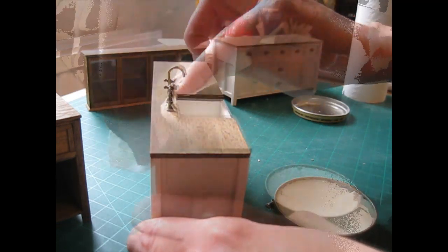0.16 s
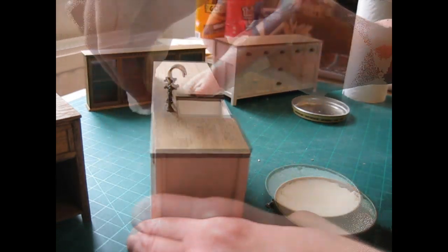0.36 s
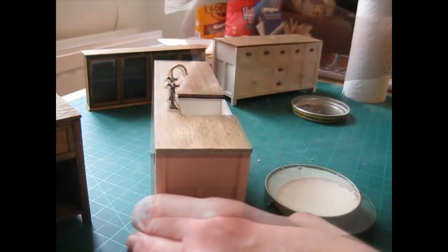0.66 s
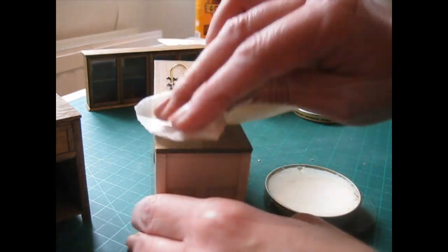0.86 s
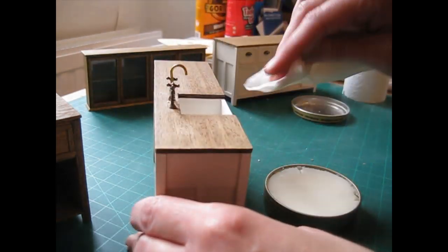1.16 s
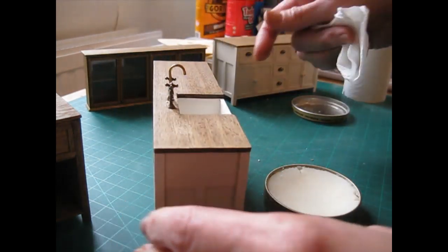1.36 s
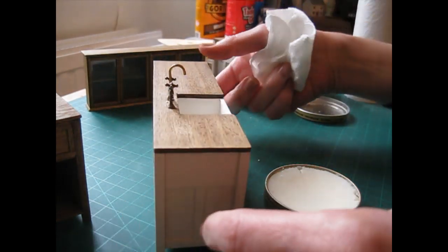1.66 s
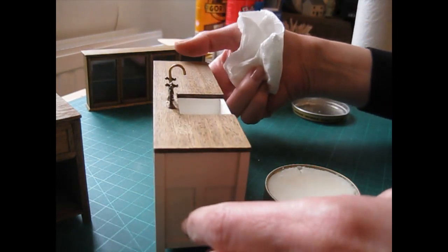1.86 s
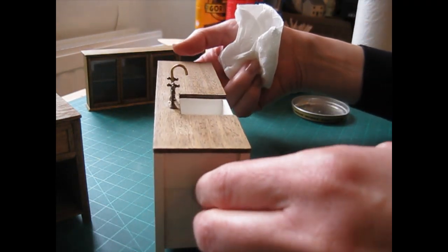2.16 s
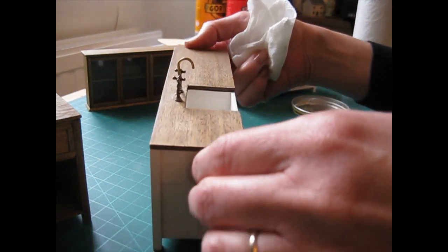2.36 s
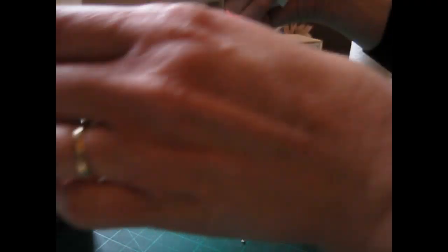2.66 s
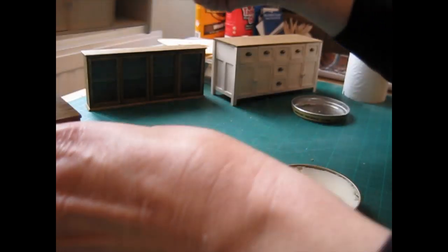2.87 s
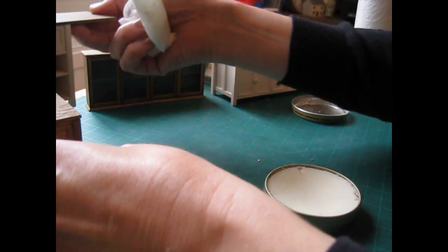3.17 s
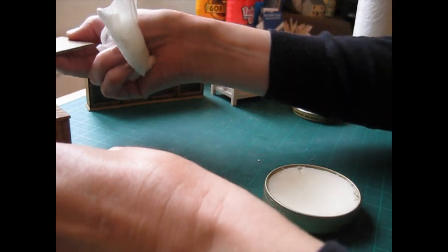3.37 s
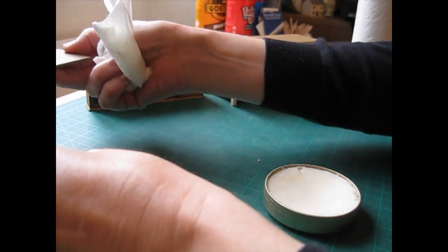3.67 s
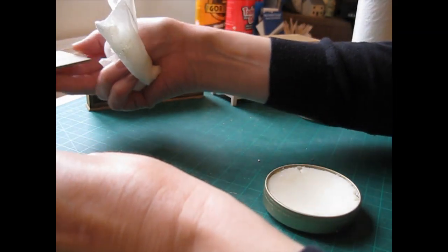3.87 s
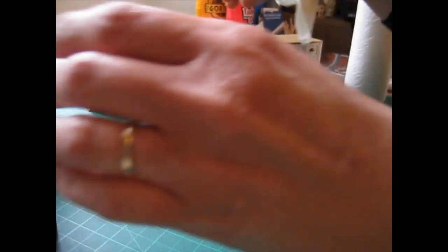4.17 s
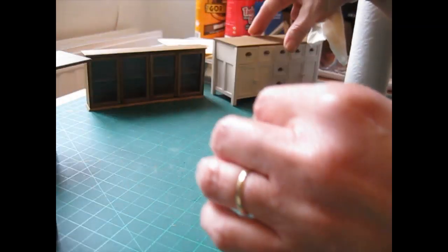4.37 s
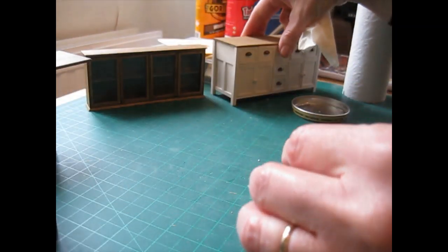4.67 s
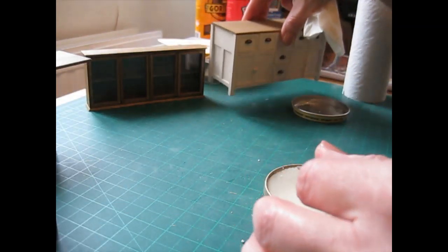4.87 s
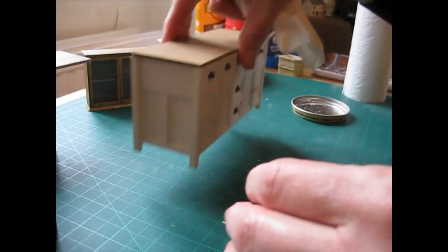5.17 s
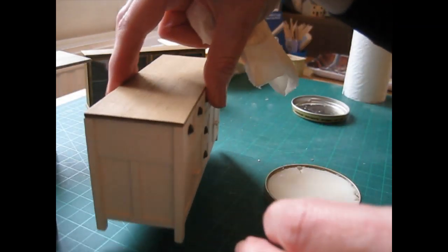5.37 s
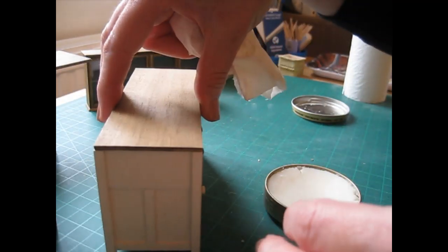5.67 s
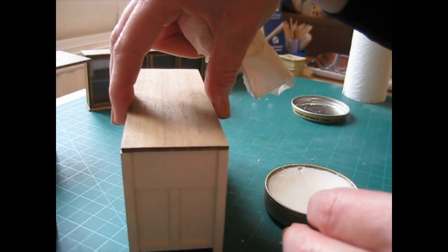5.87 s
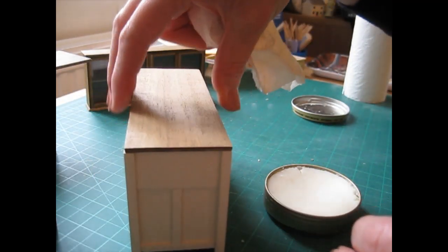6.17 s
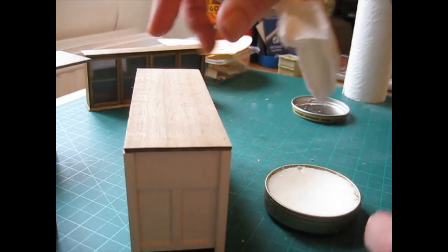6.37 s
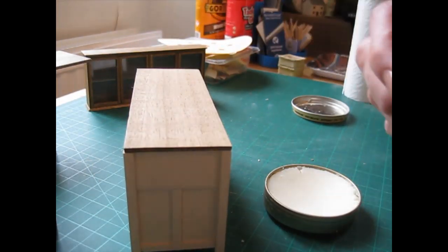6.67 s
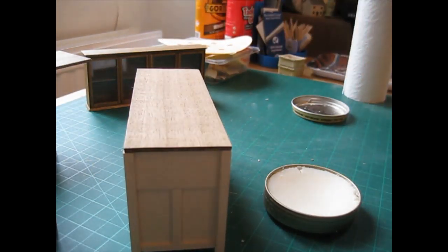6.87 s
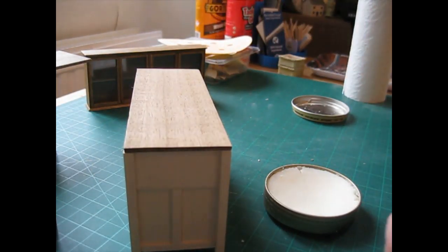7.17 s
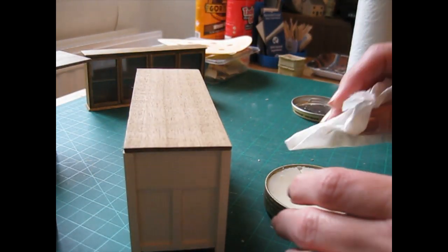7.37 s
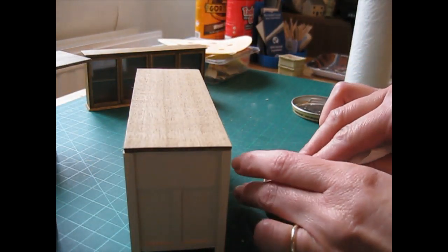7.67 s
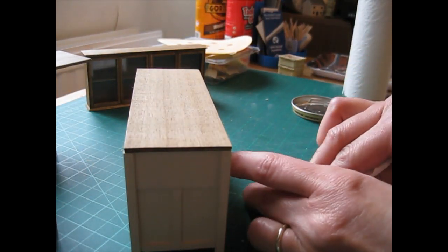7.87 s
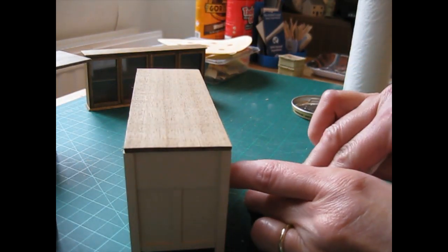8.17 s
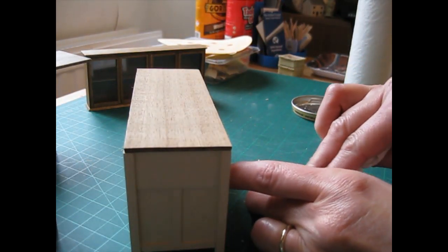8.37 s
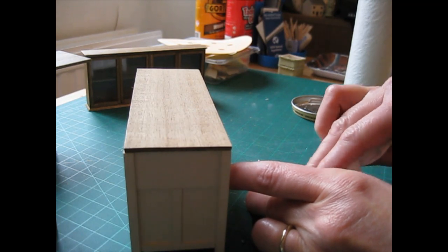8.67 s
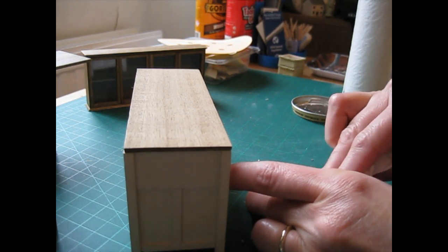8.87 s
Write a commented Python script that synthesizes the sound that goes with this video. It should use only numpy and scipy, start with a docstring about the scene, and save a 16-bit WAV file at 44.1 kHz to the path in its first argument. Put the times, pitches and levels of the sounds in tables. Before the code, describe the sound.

Papery rubbing on wood with a tiny squeak, sharp wooden knocks and light slides, then soft circular rubbing in a tin, over faint hiss.

```python
"""At a work table, a paper towel wipes a small wooden cabinet, squeaking on its waxed top. The pieces are
slid and set down on a cutting mat with knocks, snaps and one metal clink. Then the towel is bunched up
and rubbed round a tin of wax. Each rub is thousands of tiny slips that make the rubbed thing ring; each
knock is a short push and a rattle, with a faint room echo. A small camera close by hisses and has a
blind spot near 8 kHz."""
import sys
import numpy as np
from scipy import signal
from scipy.fft import rfft, irfft, next_fast_len
from scipy.io import wavfile
from scipy.ndimage import uniform_filter1d

SR = 44100
rng = np.random.default_rng(int(sys.argv[2]) if len(sys.argv) > 2 else 0)


def wav_out(sig):
    """Save sig, one row per channel (or a flat mono array), as 16-bit PCM at SR to the path in sys.argv[1]."""
    wavfile.write(sys.argv[1], SR, np.round(np.clip(np.atleast_2d(sig).T, -1, 1) * 32767).astype(np.int16))


N = 397341


def amp(db):
    """Turns decibels into a gain."""
    return 10 ** (np.asarray(db) / 20)


def unit_rms(x):
    """Scales x to an average (rms) size of 1."""
    return x / np.sqrt(np.mean(x ** 2) + 1e-20)


def value_at(points, hz):
    """Reads a curve of (frequency, value) points at hz."""
    f, value = np.transpose(points)
    return np.interp(np.log(hz + 1), np.log(f + 1), value)


def add(mix, start_s, sound):
    """Mixes a sound in at start_s and returns the mix."""
    part = mix[max(round(start_s * SR), 0):][:len(sound)]
    part += sound[:len(part)]
    return mix


def filtered(x, gain):
    """Filters x by a gain that is a function of Hz."""
    size = next_fast_len(len(x) + 4096)
    return irfft(rfft(x, size) * gain(np.fft.rfftfreq(size, 1 / SR)), size)[:len(x)]


def above(hz, edge_hz):
    """A gain that climbs steeply from 0 below the edge to 1 above it."""
    return 1 / np.sqrt(1 + (edge_hz / (hz + 1)) ** 12)


def bump(hz, centre_hz, width_hz):
    """A smooth hill of height 1 around a frequency."""
    return 1 / (1 + (2 * (hz - centre_hz) / width_hz) ** 2)


def swells(strokes, t):
    """Strokes swell and fade; returns their ringing pitch and the scratch, fine hiss and body gains."""
    peak_s, db, rise_s, fall_s, ring_hz, fine_db, body_db = np.transpose(strokes)[:, :, None]
    from_peak = np.where(t < peak_s, (peak_s - t) / rise_s, (t - peak_s) / fall_s)
    power = amp(db - 21 * from_peak ** 1.63) ** 2 + 1e-30  # round top, 21 dB down at both ends
    gains = [np.sqrt((power * amp(layer_db) ** 2).sum(0)) for layer_db in (0, fine_db, body_db)]
    return [(power * ring_hz).sum(0) / power.sum(0), *gains]


def rub(strokes, colour, peaks, span_s, split_hz, ring_width_hz, ring_db, overtone_db,
        grit_db, grain_db, flutter_db, wander_db):
    """Thousands of tiny slips, a few of them large, under a fluttering pressure, ring the thing rubbed."""
    t = np.arange(*span_s, 1 / SR)
    curves = swells(strokes, t[::32])
    ring_hz, scratch_gain, fine_gain, body_gain = (np.interp(t, t[::32], curve) for curve in curves)
    slips = rng.standard_normal(len(t)) * amp(grain_db * np.minimum(rng.exponential(1, len(t)), 4))
    pressure = unit_rms(uniform_filter1d(uniform_filter1d(rng.standard_normal(len(t)), 300), 300))
    bin_hz, frame_s, spectra = signal.stft(slips * amp(flutter_db * pressure), SR,
                                           nperseg=256, noverlap=192)
    pitch_hz = np.interp(frame_s + span_s[0], t, ring_hz)
    lift_db = sum(db * bump(bin_hz[:, None], ratio * pitch_hz, ring_width_hz)
                  for ratio, db in ((1, ring_db), (1.92, overtone_db)))
    # the contact keeps changing shape, so bright patches wander through the spectrum
    patches = uniform_filter1d(rng.standard_normal(spectra.shape), 3, axis=0)
    patches = unit_rms(uniform_filter1d(patches, 20, axis=1))
    spectra = spectra * amp(wander_db * patches + lift_db)
    slips = signal.istft(spectra, nperseg=256, noverlap=192)[1][:len(t)]
    tone = lambda hz: amp(value_at(colour, hz) + sum(db * bump(hz, f, width) for f, width, db in peaks))
    # three layers: a dull body below split_hz, a bright scratch above it, fine hiss on top
    body = filtered(slips, lambda hz: tone(hz) * (1 - above(hz, 1.007 * split_hz)))
    scratch = filtered(slips, lambda hz: tone(hz) * above(hz, 1.034 * split_hz) * (1 - above(hz, 7850)))
    fine = filtered(slips, lambda hz: above(hz, 6600) / (hz + 4000) * amp(grit_db * bump(hz, 10400, 1500)))
    sound = scratch_gain * unit_rms(scratch) + body_gain * unit_rms(body) + fine_gain * unit_rms(fine)
    return add(np.zeros(N), span_s[0], sound)


def camera_hiss(level_db=-56):
    """Steady noise from the room and the microphone's amplifier."""
    # colour of the hiss: f/Hz, level/dB
    colour = [(25, -3), (280, 0), (800, -2.5), (2300, -5), (4700, -10), (7000, -14), (9000, -20.5),
              (12000, -22), (15500, -26)]
    return amp(level_db) * unit_rms(filtered(rng.standard_normal(N), lambda hz: amp(value_at(colour, hz))))


def towel_wipes():
    """The paper towel rasps over the cabinet and makes its top ring."""
    # wipes: peak t/s, level/dB, rise/s, fall/s, ring f/Hz, fine hiss/dB, body/dB (both added to level)
    strokes = [(.03, -45.5, 0.17, 0.084, 4300, -10.5, -20), (.47, -47, 0.29, 0.21, 4000, -8, -11.5),
               (.51, -41.5, 0.055, 0.043, 4470, -17, -3), (.58, -38, 0.11, 0.031, 3200, -5, -10.5),
               (.6, -44, .04, .007, 3300, 3, -1), (.72, -54, 0.31, 0.28, 2190, -25, -12),
               (1.01, -41, 0.066, 0.14, 3000, -19, -11.5), (1.075, -39.5, 0.088, 0.13, 4530, -9, -13.5),
               (1.236, -39.5, 0.038, 0.1, 3000, -13, -11.5), (1.291, -31, 0.092, 0.11, 2660, -14, -12.5),
               (1.446, -36.5, 0.073, 0.071, 2480, -13, -14), (1.606, -52, 0.11, 0.039, 3500, -14, -11),
               (1.77, -55, 0.3, 0.18, 2400, -13.5, -10)]
    # colour of paper on wood: f/Hz, level/dB
    colour = [(150, -21), (250, -10.5), (850, -7), (1100, -0.5), (1800, 0), (2700, -0.5), (5600, -2.5),
              (7300, -3.5)]
    # peaks and a dip in the ring of the top: f/Hz, width/Hz, level/dB
    peaks = [(1520, 150, -5.5), (2050, 420, 2), (3200, 550, 2), (4280, 470, 3.5), (5100, 220, 3)]
    return rub(strokes, colour, peaks, span_s=(0, 2.05), split_hz=1720, ring_width_hz=1100,
               ring_db=4.5, overtone_db=-1.5, grit_db=4, grain_db=3.5, flutter_db=0.6, wander_db=1.9)


def towel_squeaks():
    """The towel catches and slips quickly on the waxed top: short, slightly unsteady tones."""
    # squeaks: t/s, level/dB, f/Hz, length/s
    squeaks = [(.527, -37, 3200, .012), (0.57, -31, 3110, 0.013), (0.582, -38, 3100, 0.0091)]
    mix = np.zeros(N)
    for start_s, peak_db, pitch_hz, length_s in squeaks:
        t = np.arange(0, length_s, 1 / SR)
        wobble = 1 + 0.04 * unit_rms(uniform_filter1d(rng.standard_normal(len(t)), 60))
        tone = np.sin(2 * np.pi * np.cumsum(pitch_hz * wobble) / SR)
        add(mix, start_s, amp(peak_db) * np.sin(np.pi * t / length_s) * tone)
    return mix


def knock_click(length, thump_db, hollow_db, upper_db, treble_db):
    """The click that colours one knock; a harder, brighter blow cracks more."""
    # where each of the ten levels below applies: f/Hz
    points_hz = (40, 130, 380, 850, 2000, 3400, 4600, 7200, 11000, 16000)
    crack_db = -16 + 1.74 * treble_db
    levels_db = [thump_db - 34.5, thump_db - 11.5, thump_db, hollow_db, 0,
                 upper_db, treble_db, treble_db - 12.5, crack_db, crack_db - 12.5]
    hz = abs(np.fft.fftfreq(length, 1 / SR))
    log_gain = np.log(amp(value_at(list(zip(points_hz, levels_db)), hz)))
    spectrum = np.exp(np.conj(signal.hilbert(log_gain)))  # minimum phase: no sound before the hit
    return np.fft.ifft(spectrum).real[:2048]


def wood_knocks(push_t60_s=0.0068, rattle_t60_s=0.13, bounce_s=0.0042, ring_db=-33):
    """Wood is set down or bumped: a short push, its bounce, a rough dying rattle and a soft ring."""
    # knocks: t/s, level/dB, then thump/dB, hollow/dB, upper middle/dB, treble/dB (all four against
    # 2 kHz), rattle/dB (against the push)
    knocks = [(0.608, -30, 5, 3, -1, -15, -28), (0.6121, -3.5, -11.5, -7.5, -16, -9.5, -27.5),
              (0.6216, -22, -3, -9, 1, -9, -11), (2.0842, -20, -15, -8, -4, 4, -30.5),
              (2.119, -29, 3, 4, -4, -12, -20.5), (2.281, -32, -1, -13, -18, -21, -32),
              (3.296, -38, 19, 9, -2, 5, -21), (3.5389, -19, -2, 4, -4.5, -18.5, -23),
              (3.7782, -20.5, 6, 11.5, -4, -11, -27), (4.0232, -31.5, -3, -1, -8, -2, -20),
              (4.473, -35.5, 4, 14, -1, 7, -21), (4.7034, -32.5, 13, 5, 6, -1, -20),
              (5.5552, -23, 13, 6, 0, -8, -31), (5.5845, -29, 12, 5, 2, -12, -21),
              (5.5928, -2, -6.5, 8.5, -2.5, -13, -33.5), (5.652, -32, 5, 10, -12, -11, -29),
              (5.6656, -30, 14, 1, -6, -9, -22), (5.732, -31.5, 0, -3, -8, -21, -26),
              (6.073, -38, 15, 23, -3, -10, -34), (6.1965, -24.5, 4, -9, -4, -7.5, -26),
              (6.206, -28, 3, -3, -7, -12, -29)]
    # tones the wood rings with: f/Hz, level/dB, t60/s (the time to fade by 60 dB)
    wood_tones = [(300, -3, 0.12), (412, -3.5, 0.071), (499, 2, 0.034), (733, 3.5, 0.022), (953, 3, 0.033),
                  (1197, 0.5, 0.018), (1780, 3.5, 0.034), (2170, 2.5, 0.017), (2563, 0.5, 0.034),
                  (3750, -2, 0.026)]
    hz, db, t60 = np.transpose(wood_tones)[:, :, None]
    t = np.arange(8192) / SR
    mix = np.zeros(N)
    for start_s, peak_db, *colour_db, rattle_db in knocks:
        jolts, shake = rng.standard_normal((2, len(t)))
        push = (t == 0) + 0.44 * jolts * amp(-60 * t / push_t60_s)
        bounce = 0.15 * np.pad(push, (round(bounce_s * SR), 0))[:len(t)]
        rough_db = 3 * unit_rms(uniform_filter1d(shake, 120))
        rattle = jolts[::-1] * amp(rattle_db - 60 * t / rattle_t60_s + rough_db)
        tone_hz = hz * rng.uniform(0.97, 1.02, hz.shape)
        tone_db = ring_db + db + 3.5 * rng.standard_normal(db.shape)
        ring = (amp(tone_db - 60 * t / t60) * np.sin(2 * np.pi * tone_hz * t)).sum(0)
        blow = signal.fftconvolve(push + bounce + rattle + ring, knock_click(len(t), *colour_db))[:len(t)]
        add(mix, start_s, amp(peak_db) * blow / abs(blow).max())
    return mix


def room_echo(x):
    """The room sends back many small echoes, and the high notes die first."""
    # time an echo takes to fade by 60 dB: f/Hz, t60/s
    fade_times = [(200, 0.47), (1000, 0.22), (3000, 0.21), (8000, 0.11)]
    echoes = np.zeros(SR // 2)
    slots = np.arange(180, len(echoes) - 20, 20)
    echoes[slots + rng.integers(0, 20, len(slots))] = rng.choice([-1., 1.], len(slots))
    hz, t, spectra = signal.stft(echoes, SR, nperseg=256)
    fade = amp(-60 * t / value_at(fade_times, hz)[:, None])
    tail = signal.istft(spectra * fade, SR, nperseg=256)[1]
    return signal.fftconvolve(x, tail / np.linalg.norm(tail))[:N]


def dry_snaps(rise_s=0.000067, t60_s=0.0095):
    """Paper, nails and small joints snap: tiny bursts of noise, each with one broad peak."""
    # snaps: t/s, level/dB, centre f/Hz
    snaps = [(1.2317, -23, 4000), (1.297, -27, 2630), (1.531, -39, 4000), (1.56, -38.5, 3950),
             (1.6966, -36, 3200), (2.825, -37, 3000), (2.883, -35, 3070), (2.9128, -30, 5000),
             (2.9928, -36, 2670), (3.451, -39, 3500), (3.478, -42, 3620), (3.532, -34, 3600),
             (3.578, -38.5, 3400), (3.7283, -40, 4870), (3.882, -43, 5500), (3.975, -38, 4000),
             (4.0035, -33, 2400), (4.7043, -36, 10500), (5.2235, -44, 3460), (6.732, -26.5, 3000),
             (6.936, -30, 3300), (7.2342, -27, 3200), (7.253, -42, 11000), (7.254, -31.5, 3200),
             (7.6746, -36.5, 3400), (8.2773, -30, 4500), (8.372, -31, 4400)]
    t = np.arange(800) / SR
    floor = lambda hz: 0.25 * (1 - 0.98 * above(hz, 8200))
    mix = np.zeros(N)
    for start_s, peak_db, centre_hz in snaps:
        burst = rng.standard_normal(len(t)) * amp(-60 * t / t60_s) * np.minimum(t / rise_s, 1)
        snap = filtered(burst, lambda hz: above(hz, 0.72 * centre_hz)
                        * (floor(hz) + bump(hz, centre_hz, 2600)))
        add(mix, start_s, amp(peak_db) * snap / abs(snap).max())
    return mix


def wood_slides():
    """The cabinet's pieces scrape over the cutting mat with a hollow ring."""
    # slides: peak t/s, level/dB, rise/s, fall/s, ring f/Hz, fine hiss/dB, body/dB (both added to level)
    strokes = [(2.125, -48.5, 0.034, 0.078, 1950, -17, -18), (2.33, -50.5, 0.26, 0.22, 2050, -18, 0),
               (2.386, -41.5, 0.029, 0.074, 2050, -14.5, -6), (2.445, -44.5, 0.09, 0.031, 2050, -13, -25),
               (3.372, -50.5, 0.078, 0.056, 720, -5, -3), (3.947, -51.5, 0.13, 0.069, 714, -13.5, -10.5),
               (4.026, -47, .006, .008, 3300, -5, -5), (4.032, -49.5, 0.041, 0.24, 2720, -17, -22),
               (4.22, -51, 0.15, 0.16, 2520, -18, -9), (4.486, -53, 0.078, 0.086, 3170, -17, -0.5),
               (4.6, -59, 0.096, 0.086, 4070, -5.5, -1), (5.673, -48, 0.011, 0.048, 2220, -13, -2),
               (5.77, -43.5, 0.024, 0.11, 2140, -13, -1), (5.913, -50, 0.1, 0.037, 2170, -16, -3),
               (6.154, -52.5, 0.018, 0.037, 5530, -10, -4), (6.202, -53, 0.032, 0.037, 2500, -5, -9),
               (6.338, -50.5, 0.068, 0.2, 2330, -18, -12), (6.63, -51.5, 0.15, 0.062, 2050, -16, -11)]
    # colour of wood on the mat: f/Hz, level/dB
    colour = [(100, -47), (200, -10), (400, -13), (1400, -8.5), (2800, -9), (7300, -14)]
    # where the cabinet rings: f/Hz, width/Hz, level/dB
    peaks = [(740, 87, 4.8), (2150, 330, 4.3), (3500, 300, 2.5), (4300, 440, 2)]
    return rub(strokes, colour, peaks, span_s=(2, 6.75), split_hz=1350, ring_width_hz=420,
               ring_db=11, overtone_db=7, grit_db=4.5, grain_db=3, flutter_db=2, wander_db=1.3)


def metal_clink(start_s=4.024, level_db=-37):
    """A small metal part is touched and rings briefly with a few unrelated tones."""
    # tones of the metal: f/Hz, level/dB, t60/s
    metal_tones = [(1800, -4, 0.039), (3340, 0.5, 0.049), (4630, -7, 0.089)]
    t = np.arange(4000) / SR
    ring = sum(amp(db - 60 * t / t60) * np.sin(2 * np.pi * hz * t) for hz, db, t60 in metal_tones)
    return add(np.zeros(N), start_s, amp(level_db) * ring)


def towel_bunching(fine_db=-14):
    """The paper rasps as it is squeezed into a bunch."""
    # squeezes: peak t/s, level/dB, rise/s, fall/s, ring f/Hz, body/dB (added to level)
    squeezes = [(6.739, -42.5, 0.054, 0.098, 2150, -2), (6.81, -43.5, 0.092, 0.22, 2140, -5.5),
                (6.946, -43, 0.066, 0.077, 2300, -5.5), (7.074, -44, 0.14, 0.12, 2200, -3.5),
                (7.17, -42.5, 0.16, 0.14, 2200, -8), (7.265, -41.5, 0.027, 0.076, 3500, -9),
                (7.408, -42.5, 0.11, 0.063, 3500, -6.5)]
    # colour of the squeezed paper: f/Hz, level/dB
    colour = [(150, -24), (700, -11), (1500, -6.5), (2200, -4.5), (7300, -8.5)]
    # where the towel rings: f/Hz, width/Hz, level/dB
    peaks = [(1040, 110, 3.7), (2150, 46, 8.8), (4040, 190, 2.2)]
    strokes = [(*squeeze, fine_db, body_db) for *squeeze, body_db in squeezes]
    return rub(strokes, colour, peaks, span_s=(6.6, 7.6), split_hz=2450, ring_width_hz=420,
               ring_db=3, overtone_db=-2.5, grit_db=1, grain_db=2.5, flutter_db=1, wander_db=1.9)


def towel_in_tin(ring_hz=3060, fine_db=-13):
    """The towel is rubbed round the tin of wax and makes the tin ring."""
    # turns of the towel: peak t/s, level/dB, rise/s, fall/s, body/dB (added to level)
    turns = [(7.52, -49.5, 0.096, 0.19, -4), (7.70, -50, 0.067, 0.32, -4), (7.82, -52, 0.29, 0.14, 0.5),
             (7.922, -47.5, 0.12, 0.22, -3), (8.1, -49, 0.1, 0.17, -5), (8.19, -51, 0.1, 0.11, -2.5),
             (8.275, -46, 0.055, 0.11, -2.5), (8.385, -46, 0.11, 0.11, -1.5),
             (8.47, -50.5, 0.082, 0.24, -4), (8.575, -47.5, 0.059, 0.17, -1.5),
             (8.69, -46.5, 0.11, 0.14, -6.5), (8.86, -48.5, 0.14, 0.27, -5.5),
             (8.955, -37.5, 0.056, 0.079, -6)]
    # colour of paper in the tin: f/Hz, level/dB
    colour = [(150, -12.5), (800, -7), (1500, -7.5), (2750, 0), (7300, -3)]
    # where the tin rings: f/Hz, width/Hz, level/dB
    peaks = [(1120, 280, 10.2), (1330, 250, 10.8), (1750, 170, 8.7), (2290, 190, 4.4)]
    strokes = [(*turn, ring_hz, fine_db, body_db) for *turn, body_db in turns]
    return rub(strokes, colour, peaks, span_s=(7.35, 9.01), split_hz=2450, ring_width_hz=1100,
               ring_db=2.5, overtone_db=0.5, grit_db=1.5, grain_db=3, flutter_db=1, wander_db=1.9)


def scene():
    """Rubs, squeaks and blows over the hiss; only the blows echo."""
    rubs = towel_wipes() + wood_slides() + towel_bunching() + towel_in_tin()
    knocks = wood_knocks()
    squeaks = towel_squeaks()
    blows = knocks + dry_snaps() + metal_clink()
    return (rubs + squeaks + blows + amp(-16.5) * room_echo(blows) + camera_hiss())[None]


def record(dry, top_hz=15720):
    """The camera loses a narrow band near 8 kHz, lifts the treble above it and cuts off at top_hz."""
    # the camera's dip and lift: f/Hz, level/dB
    response = [(6500, 0.5), (7300, -2), (7650, -7.5), (7800, -16), (7880, -46), (7960, -20), (8200, -3),
                (8800, 4), (9500, 6)]
    dipped = filtered(dry[0], lambda hz: amp(value_at(response, hz)))
    low_pass = signal.firwin(511, top_hz, window=("kaiser", 9), fs=SR)
    return signal.oaconvolve(dipped, low_pass, "same")[None]


dry = scene()
out = record(dry)
wav_out(out)
```